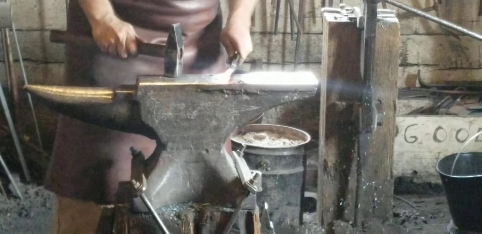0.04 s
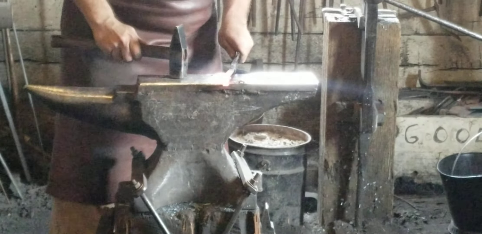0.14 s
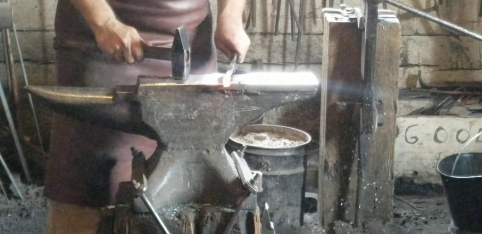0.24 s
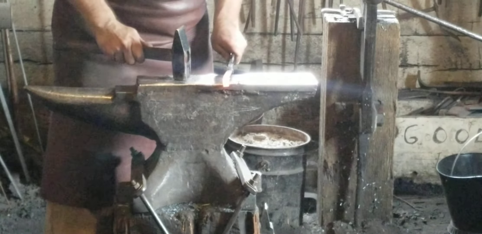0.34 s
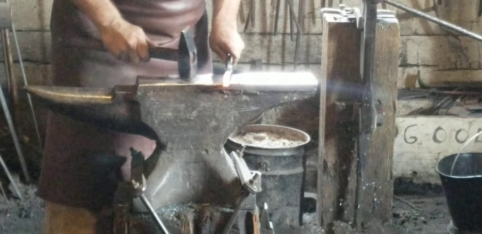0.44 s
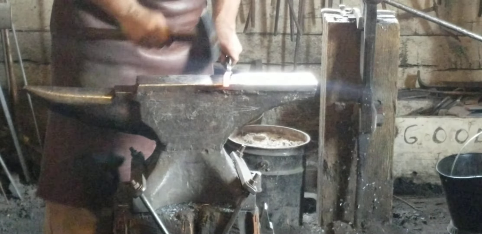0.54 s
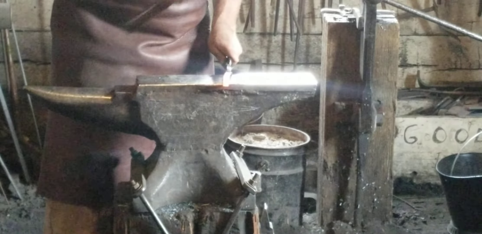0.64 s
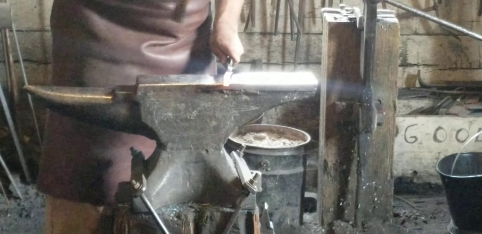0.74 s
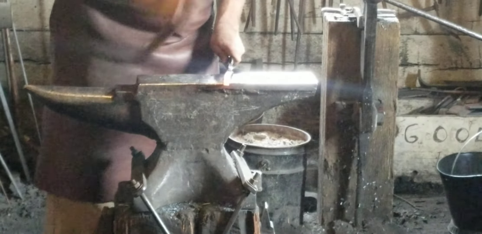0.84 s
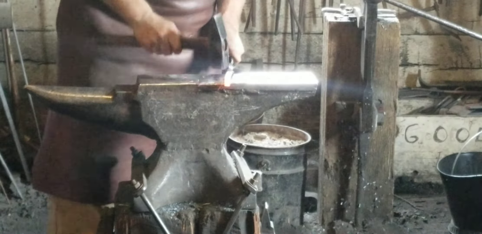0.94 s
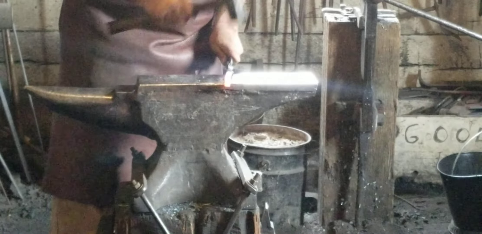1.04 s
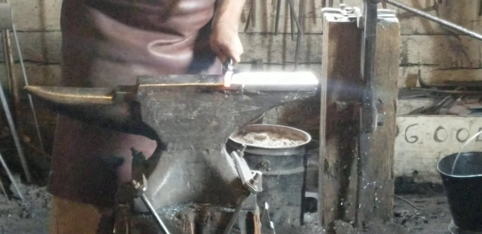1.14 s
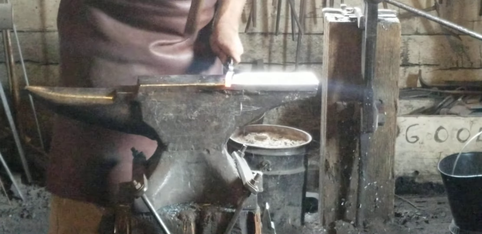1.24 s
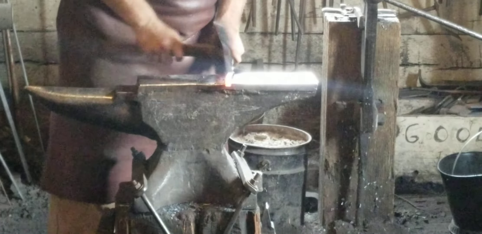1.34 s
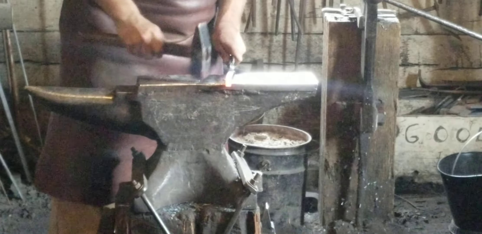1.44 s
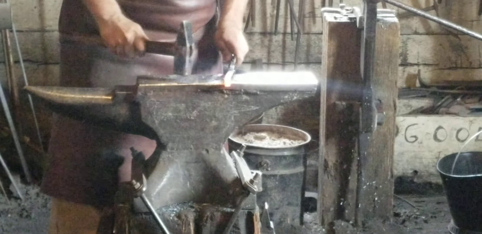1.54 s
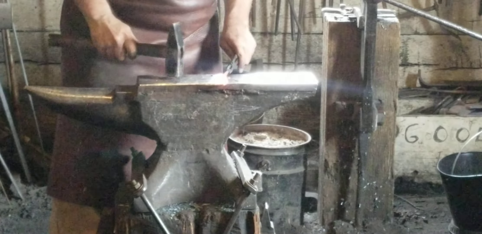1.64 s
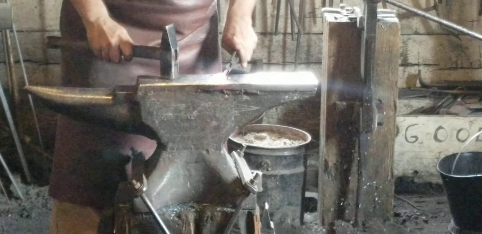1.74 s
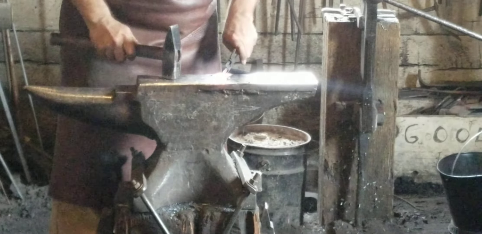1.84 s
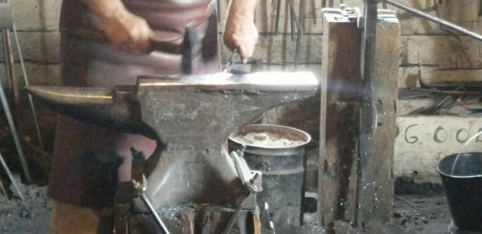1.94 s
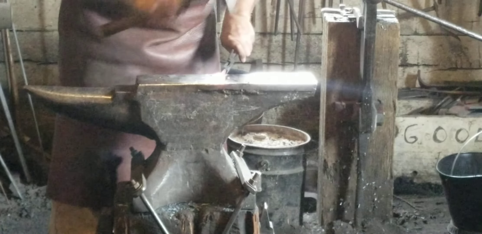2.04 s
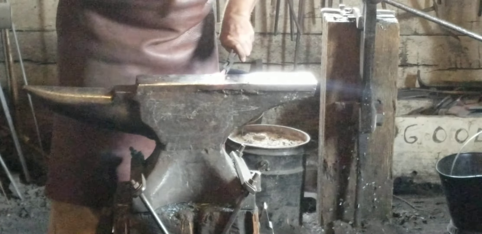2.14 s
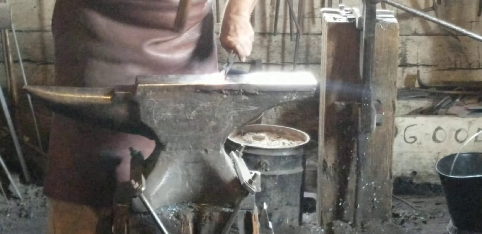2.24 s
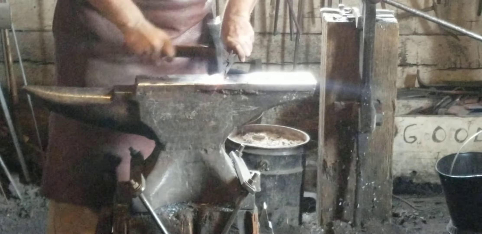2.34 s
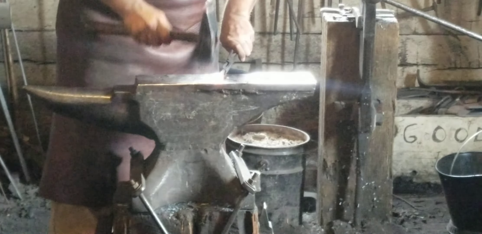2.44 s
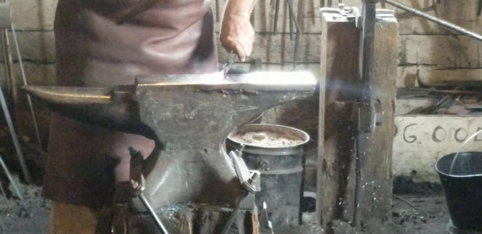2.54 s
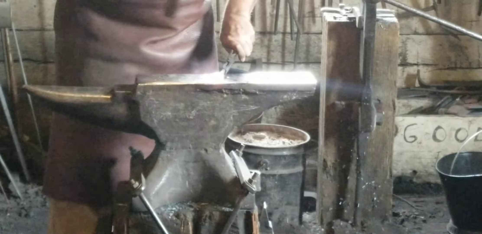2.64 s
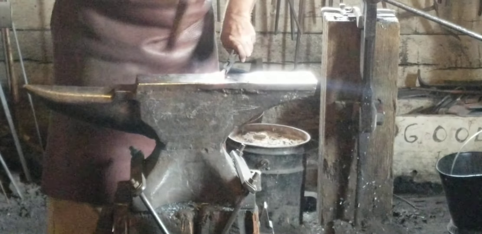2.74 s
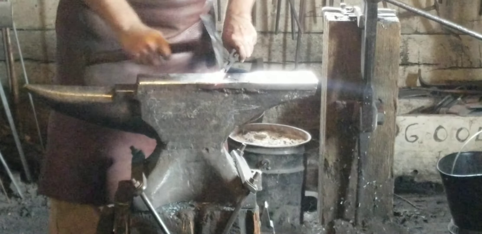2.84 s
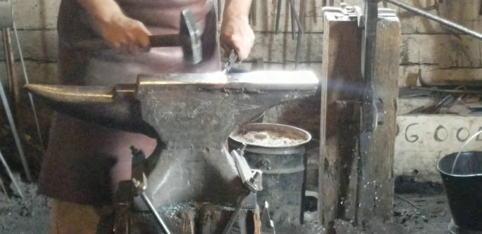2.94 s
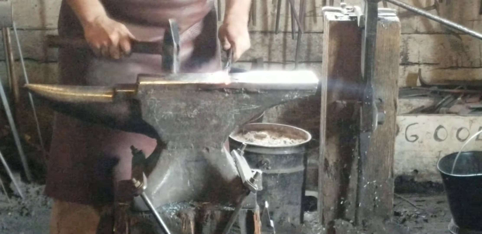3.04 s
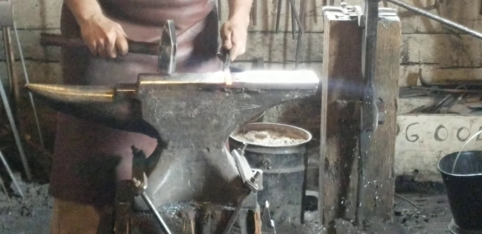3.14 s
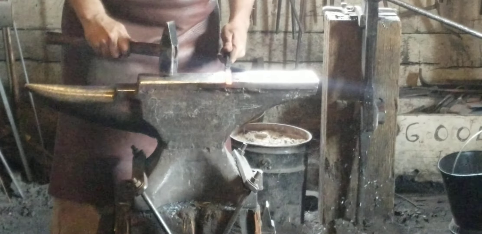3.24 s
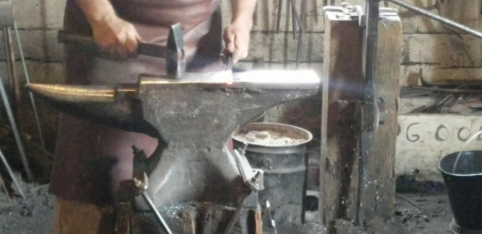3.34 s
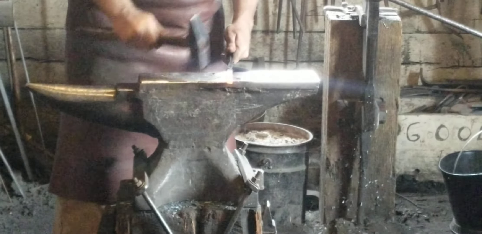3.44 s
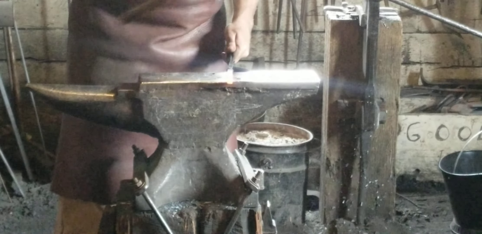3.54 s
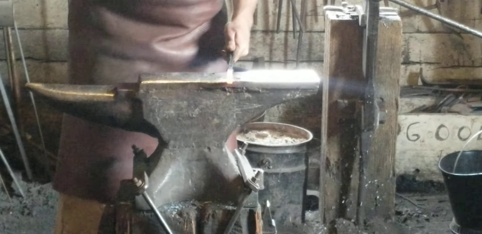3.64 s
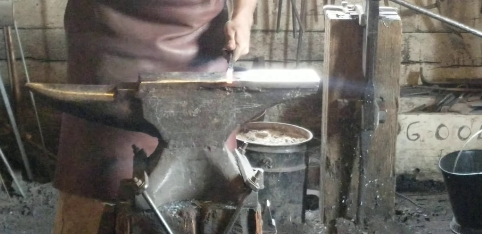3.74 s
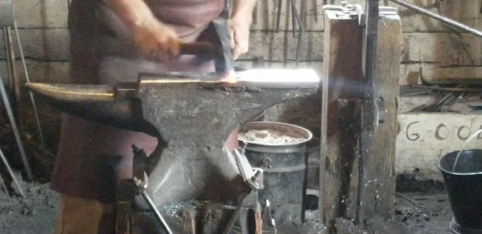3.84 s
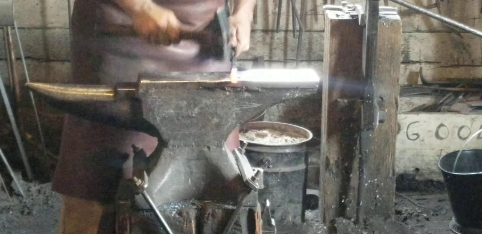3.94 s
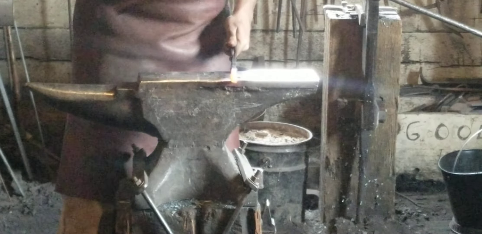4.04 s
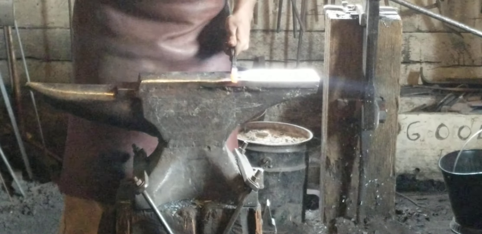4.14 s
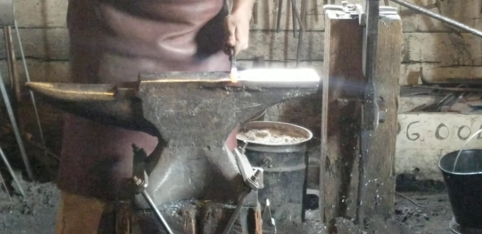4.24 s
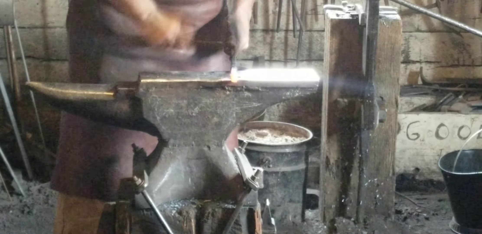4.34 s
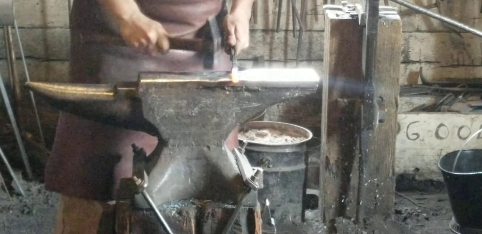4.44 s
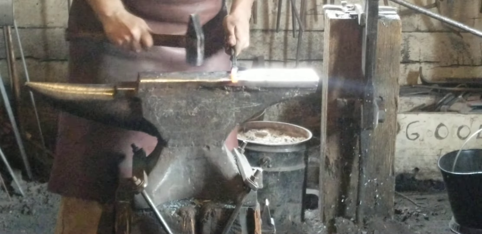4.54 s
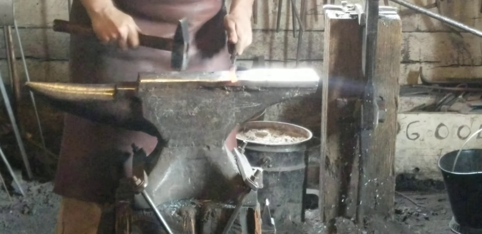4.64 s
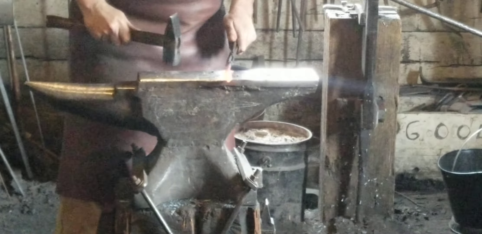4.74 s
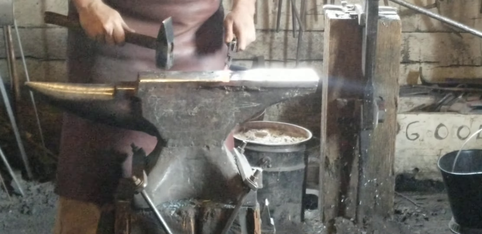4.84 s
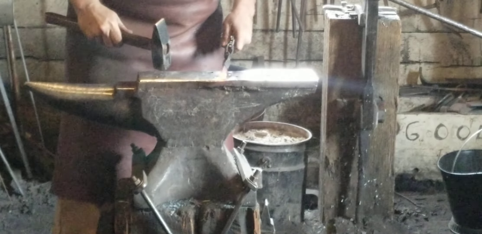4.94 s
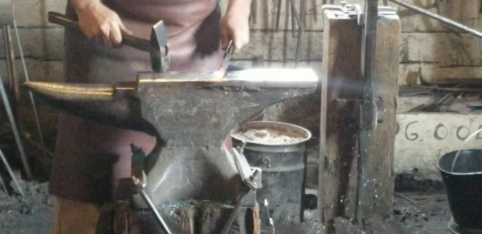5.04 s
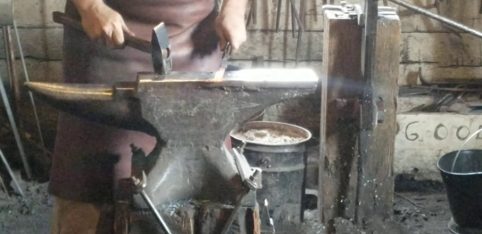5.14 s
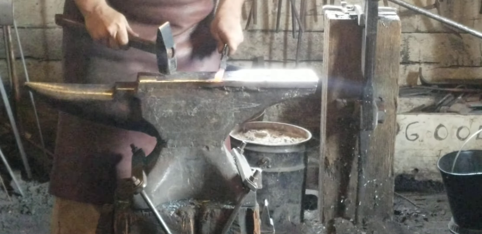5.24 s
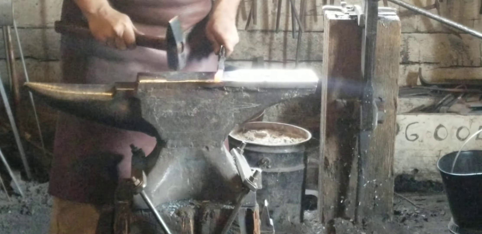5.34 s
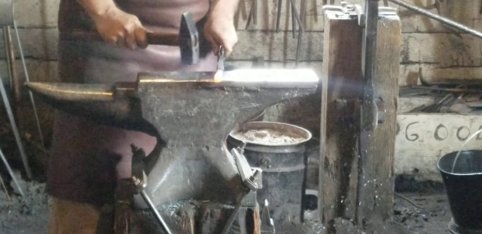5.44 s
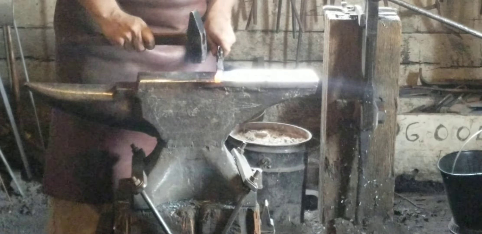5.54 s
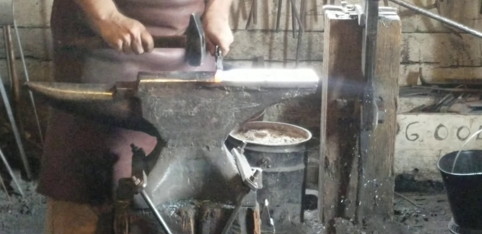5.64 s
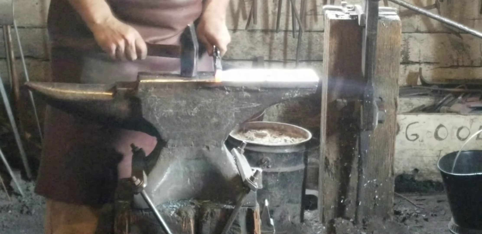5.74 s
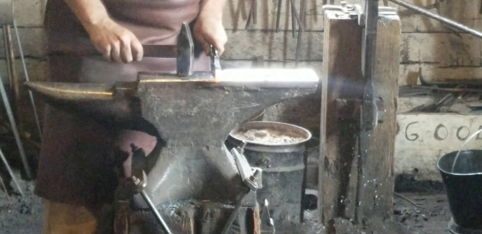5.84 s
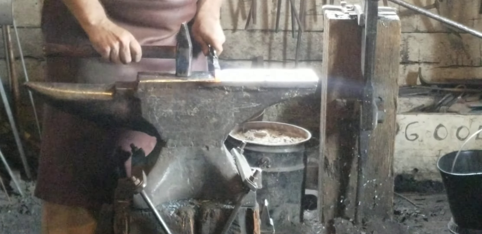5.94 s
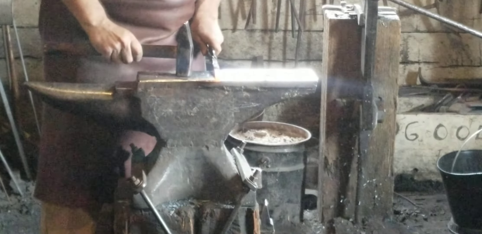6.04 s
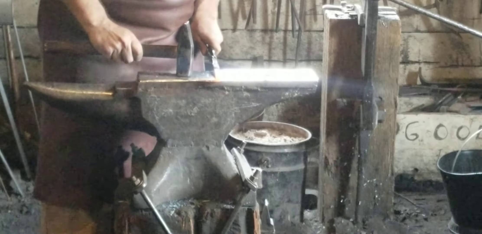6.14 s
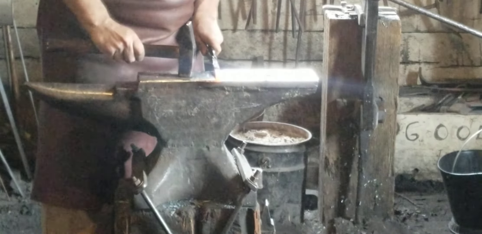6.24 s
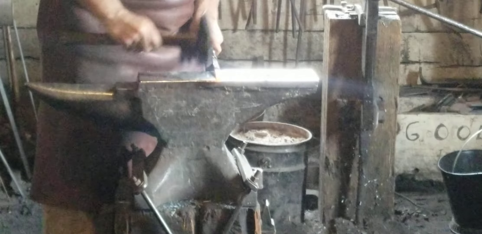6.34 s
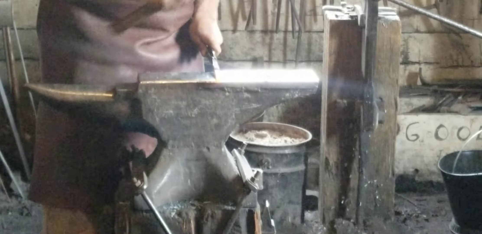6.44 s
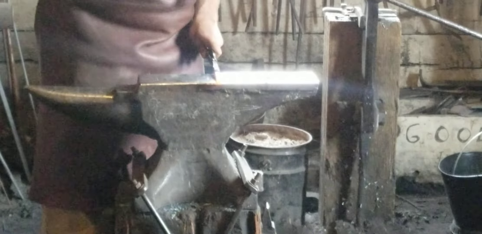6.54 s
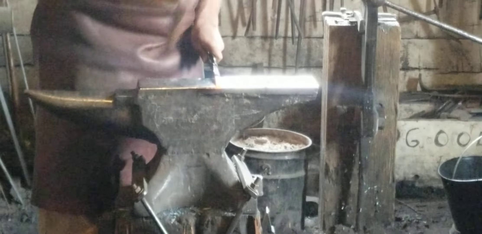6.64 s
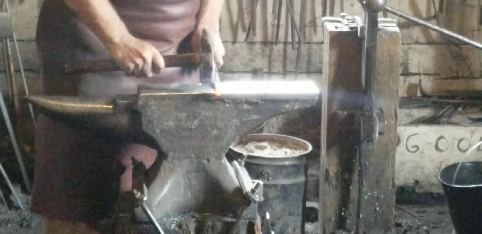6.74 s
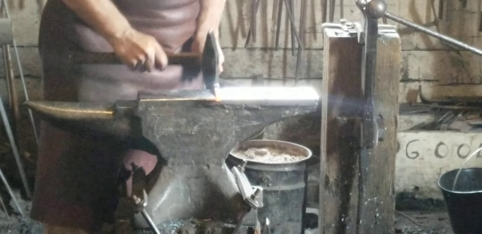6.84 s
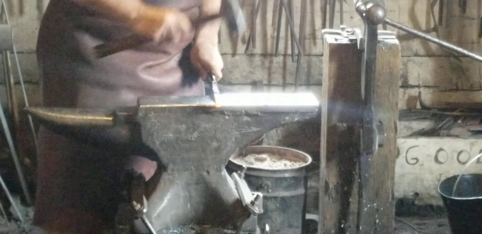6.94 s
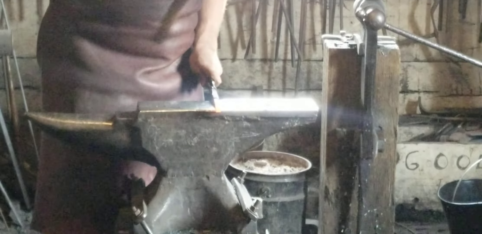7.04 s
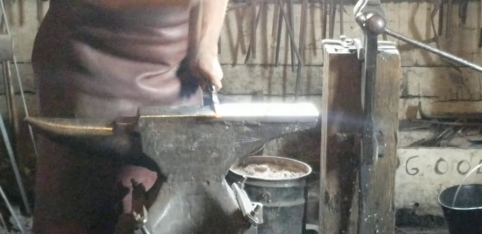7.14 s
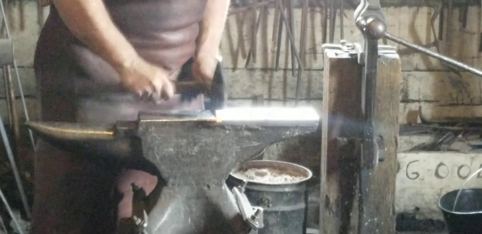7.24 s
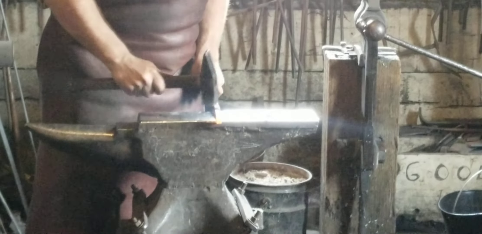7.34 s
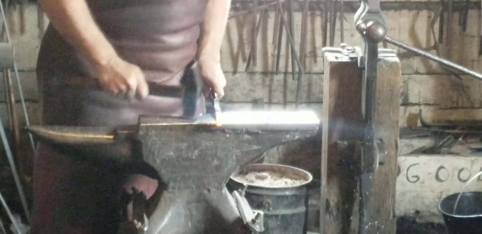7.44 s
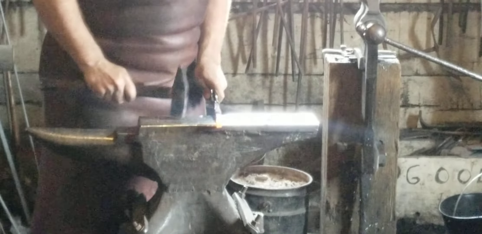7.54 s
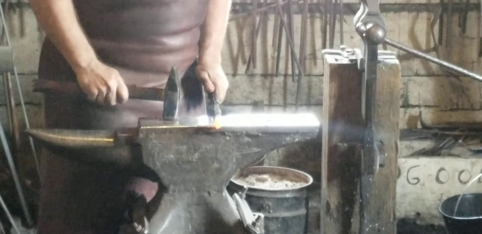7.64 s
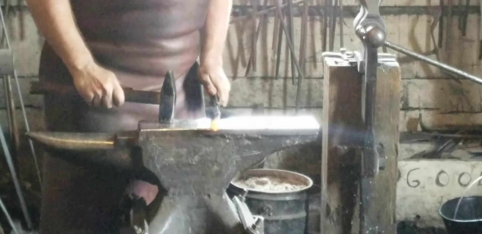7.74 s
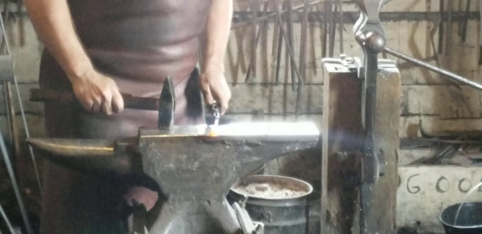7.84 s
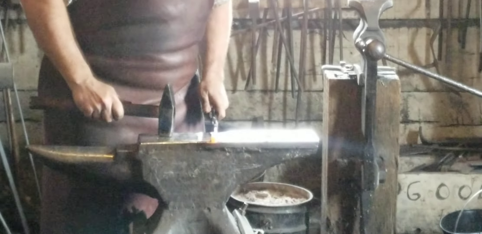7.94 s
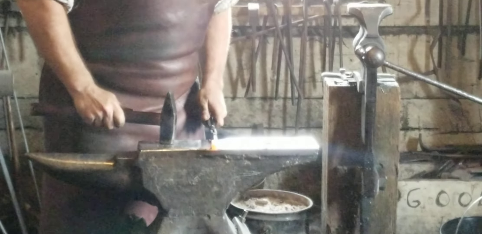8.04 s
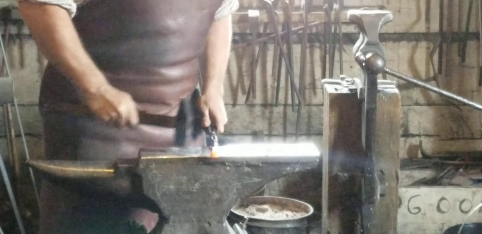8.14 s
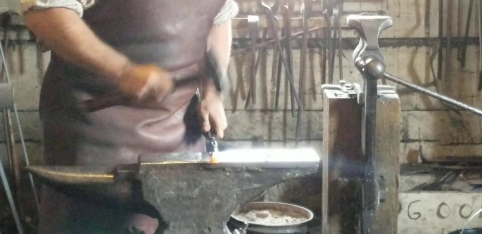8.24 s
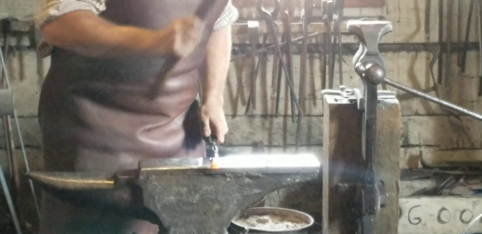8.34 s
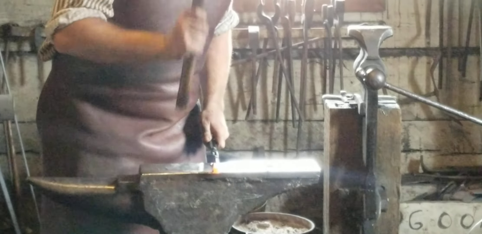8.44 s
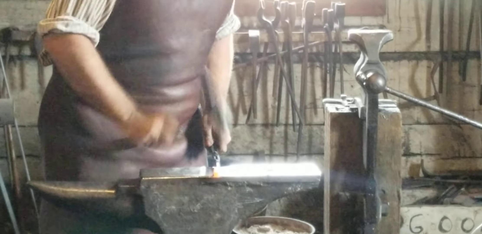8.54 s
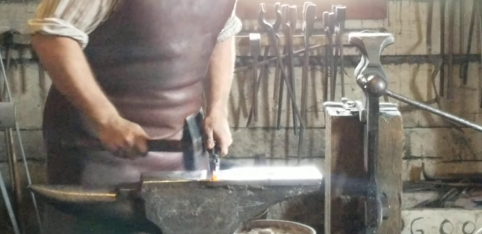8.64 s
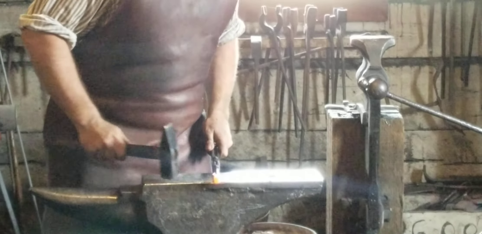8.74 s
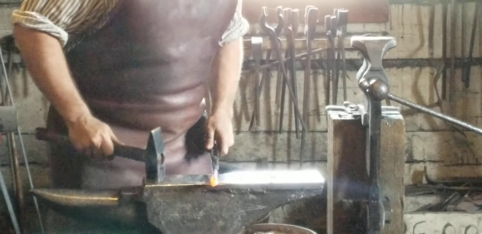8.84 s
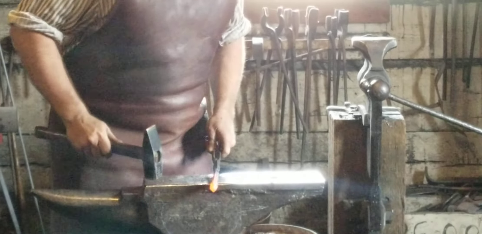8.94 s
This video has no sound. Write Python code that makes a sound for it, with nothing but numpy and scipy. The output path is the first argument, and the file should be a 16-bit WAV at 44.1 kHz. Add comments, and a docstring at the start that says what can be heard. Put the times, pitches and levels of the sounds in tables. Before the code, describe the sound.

Over the low rumble of a workshop machine, which eases after the first strike, a smith hammers hot steel in unhurried pairs of clanging, thudding blows. Between them the hammer drops lightly on the anvil, bouncing with high pings, and tongs scrape softly. The heavy blows pause past the middle, then three more fall amid faint rustles and tiny clicks. Everything is heard from nearby in a mildly reverberant room.

```python
"""A smith forges hot steel on an anvil in a brick workshop. At first a machine rumbles and hums while the
bar slides softly across the face. Then heavy blows fall, mostly in pairs: the stump thuds, the bar
clanks, the modes of the steel clang and the room reverberates. The rumble settles after the first blow.
Between blows the hammer drops lightly on the bare anvil, bounces and pings, and the tongs scrape.
Near the end come soft rustles as the smith moves, and a few small dry clicks."""
import sys
import numpy as np
from scipy import signal
from scipy.fft import rfft, irfft
from scipy.io import wavfile

SR = 44100
rng = np.random.default_rng(int(sys.argv[2]) if len(sys.argv) > 2 else 0)


def generate_wav(signal):
    """Clip the signal to [-1, 1] and save it as 16-bit WAV at the path in sys.argv[1]."""
    frames = np.transpose(np.atleast_2d(signal))
    scaled = np.clip(frames, -1, 1) * 32767
    pcm = np.round(scaled).astype(np.int16)
    wavfile.write(sys.argv[1], SR, pcm)


N = 396018
RESPONSE_T = np.arange(int(.9 * SR)) / SR   # time axis of an impulse response, in seconds
BAND_EDGES_HZ = np.geomspace(22, 17500, 40)
BAND_CENTRES_HZ = np.sqrt(BAND_EDGES_HZ[1:] * BAND_EDGES_HZ[:-1])

# natural frequencies of hammer and anvil: pitch_hz
MODE_HZ = np.array([1316, 1492, 1528, 1715, 1795, 1947, 2395, 2474, 2506, 2763, 3052, 3284, 4497, 4560, 5575, 5782, 8512, 9498, 10160, 10481, 13143])
# spectra of the stump's thud, the steel's clank, a light tick and a soft hiss: frequency_hz, density_db
THUD_SPECTRUM = [(30, -18), (60, -7), (100, 1), (170, 3.5), (290, -2), (380, -3), (520, -7.5), (800, -16.5),
                 (1500, -48.5)]
CLANK_SPECTRUM = [(200, -20.5), (450, -18.5), (750, -9), (1100, 1), (1500, 5), (1950, 1), (2300, 2.5),
                  (2800, -4.5), (4000, -18), (8000, -44)]
TICK_SPECTRUM = [(1000, -19.5), (2200, 10.5), (3400, 11.5), (4500, 7.5), (6200, 4.5), (8000, -1.5),
                 (9300, -24), (11000, -9.5), (13000, -16), (14200, -27.5), (16000, -39)]
HISS_SPECTRUM = [(300, -12), (550, 1), (900, -4), (1400, -7), (2200, -15.5), (3500, -28.5), (8000, -39.5),
                 (13000, -37), (16000, -38.5)]


def heavy_blows(room, modes, thud_db, push_db, boom_db, clank_db, crack_db, pan_db):
    """Impact excitation: the hammer hits the soft bar, the stump thuds, the struck steel rings."""
    # blows, each on its own spot: start_s, force_db, extra_clang_db, extra_ping_db
    blows = [(.901, -4.5, 3, -0.5), (1.347, 1, -2, -3.5), (2.35, 0, 0.5, 3.5), (2.8318, 2, -0.5, -1.5),
             (3.849, -0.5, 1, 4.5), (4.359, 2, -2.5, 15.5), (6.717, -8.5, 0, 4), (7.251, -.5, -1, -7.5),
             (8.568, -.5, -5, 3.5)]
    # crack of the hammer face: frequency_hz, density_db
    crack_spectrum = [(1000, -19), (2200, -3.5), (3000, 2.5), (4000, 2.5), (6200, 3), (8200, -2.5),
                      (9200, -20), (11000, 2), (13000, 6), (16000, -14.5)]
    # excitation of each mode by a blow: gain_db
    mode_db = [-23.5, -18.5, -19, -23.5, -25, -18, -16, -11.5, -4, -21, -21, -20, -30, -13.5, -25, -15.5,
               -17, -25, -8.5, -3.5, -7.5]
    # the five registers and their growth with force: gain_db; growth_db_per_db
    register_db = [-17, -15, -24, -29.5, -29.5]
    growth = [0.79, 1.2, 1.1, 0.41, 0.53]
    out = np.zeros((2, N))
    thud = from_db(thud_db) * room_impulse(room, THUD_SPECTRUM)[0]
    thud += from_db(push_db) * stump_push(low_hz=139, high_hz=281, t60_s=0.036)
    middle, treble = room_impulse(room, CLANK_SPECTRUM), room_impulse(room, crack_spectrum)
    for start_s, force_db, extra_clang_db, extra_ping_db in blows:
        clank, clang, crack, ping, zing = np.array(register_db) + force_db * np.array(growth)
        contact = blend_paths(from_db(clank + clank_db) * middle + from_db(crack + crack_db) * treble)
        ring = ringing(modes, mode_db, (clank, clang + extra_clang_db, crack, ping + extra_ping_db, zing))
        bass = thud + from_db(boom_db) * room_boom(pitch_hz=65.15, swell_s=.22)
        add(out, start_s, pan(contact + ring, pan_db) + bass)
    return out


def light_taps(room, modes, knock_db, clank_db, tick_db, pan_db):
    """Elastic impact on the bare face: a harder contact excites the high ping far more strongly."""
    # taps and bounces: start_s, strength_db, hardness_db, extra_clang_db, extra_zing_db
    taps = [(1.479, 2.5, -2, 13.5, -6), (1.609, 1, 2.5, -6, -4), (1.688, 1, 5.5, -5, -4),
            (3.035, 2, 5.5, -12, -3), (3.149, -1.5, 6, -1.5, -10), (3.229, 1.5, -4, -4, -4),
            (4.653, -2.5, 4.5, 2.5, 3.5), (4.882, -19.5, 2.5, 3.5, 0), (5.753, -2, 1.5, -4.5, 4),
            (5.843, 0.5, -11, 0, -3), (7.463, 4, -5.5, 0, -4), (7.569, 4, -6, -5, 1.5),
            (8.722, 0, -4, 14, -4), (8.858, -1.5, -8.5, 13.5, -1)]
    # excitation of each mode by a tap: gain_db
    mode_db = [-10, -17.5, -11, -12.5, -13.5, -17, -17.5, -13.5, -1.5, -8.5, -27, -21.5, -18, -10.5, -41,
               -24, -23.5, -53, -4, -3, 0.5]
    # the five registers and their growth with hardness: gain_db; growth_db_per_db
    register_db = [-38, -42, -34.5, -55.5, -50]
    growth = [0, 1, 0.7, 3.5, 0.6]
    out = np.zeros((2, N))
    body = from_db(clank_db) * room_impulse(room, CLANK_SPECTRUM)
    body += from_db(knock_db) * room_impulse(room, THUD_SPECTRUM)
    tick = from_db(tick_db) * room_impulse(room, TICK_SPECTRUM)
    for start_s, strength_db, hardness_db, extra_clang_db, extra_zing_db in taps:
        levels_db = np.array(register_db) + strength_db + hardness_db * np.array(growth)
        clank, clang, crack, ping, zing = levels_db
        contact = blend_paths(from_db(clank) * body + from_db(crack) * tick)
        ring = ringing(modes, mode_db, (clank, clang + extra_clang_db, crack, ping, zing + extra_zing_db))
        add(out, start_s, contact + ring)
    return pan(out, pan_db)


def steel_modes(room, wet, linger):
    """Free vibration: each normal mode is a damped sine, heard with its wavering reverberation."""
    # decay time of each mode: t60_s
    mode_t60_s = [0.84, 0.38, .45, 0.52, .4, 0.41, .26, 0.38, 0.29, 0.35, 0.27, 0.41, 0.32, 0.22, 0.36, .3,
                  0.3, 0.18, 0.63, 0.34, 0.53]
    response, modes = room[:, 0].sum(axis=0), []
    for pitch_hz, t60_s in zip(MODE_HZ, mode_t60_s):
        phase = rng.uniform(0, np.pi, (2, 1))
        sine = np.sin(2 * np.pi * pitch_hz * RESPONSE_T + phase) * decay(t60_s)
        reverb = convolve(sine, response) * decay(linger * t60_s)
        ring = sine / sine.std() + wet * reverb / reverb.std(axis=1, keepdims=True)
        modes.append(ring / ring.std(axis=1, keepdims=True) * unit_onset(sine).std())
    return np.array(modes)


def ringing(modes, mode_db, register_db):
    """Modal superposition: the point of impact sets how strongly each register and mode is excited."""
    register_edges_hz = [2200, 3150, 9850, 10320]   # between clank, clang, crack, ping and zing
    register = np.searchsorted(register_edges_hz, MODE_HZ)
    scatter_db = 3.0 * rng.standard_normal(len(MODE_HZ))
    gains = from_db(np.array(mode_db) + np.array(register_db)[register] + scatter_db)
    return np.tensordot(gains, modes, axes=1)


def stump_push(low_hz, high_hz, t60_s):
    """Heavily damped oscillation: the anvil drives its stump down, which swings at two frequencies."""
    swing = np.sin(2 * np.pi * low_hz * RESPONSE_T) - np.sin(2 * np.pi * high_hz * RESPONSE_T)
    return unit_onset(swing * decay(t60_s))


def room_boom(pitch_hz, swell_s):
    """Resonance: a low room mode swells a moment after a heavy blow."""
    swell = (RESPONSE_T / swell_s) ** 2
    phase = rng.uniform(0, 2 * np.pi)
    return np.sin(2 * np.pi * pitch_hz * RESPONSE_T + phase) * swell * np.exp(1 - swell)


def tong_scrapes(room):
    """Rough friction: as the tongs turn the bar, a grainy force drives the response of the contact."""
    # scrapes on the anvil: start_s, decay_s, level_db
    scrapes = [(2.089, .036, -57), (3.59, 0.24, -59), (4.25, 0.065, -62.5), (5.137, 0.0068, -52.5),
               (5.164, 0.056, -42.5), (5.682, 0.11, -56.5), (6.148, 0.068, -65.5), (6.924, 0.07, -53),
               (7.21, 0.039, -54.5), (8.238, 0.11, -63)]
    # bright grit: frequency_hz, density_db
    grit_spectrum = [(2000, -27.5), (5000, -11), (7500, -12), (9300, -14.5), (12500, 8.5), (16000, -2.5)]
    # shares of clank, tick and grit: gain_db
    mix_db = [-0.5, -1, -7]
    out = np.zeros((2, N))
    spectra = (CLANK_SPECTRUM, TICK_SPECTRUM, grit_spectrum)
    paths = sum(from_db(db) * room_impulse(room, spectrum) for db, spectrum in zip(mix_db, spectra))
    for start_s, decay_s, level_db in scrapes:
        grain = from_db(level_db) * blend_paths(paths) * decay(t60_s=2.2)
        add(out, start_s, convolve(grain, crunch(decay_s)))
    return out


def crunch(decay_s):
    """Brittle fracture: crushed scale gives uneven force pulses that die away, of unit total energy."""
    grains = rng.standard_normal(SR // 4) ** 3 * np.exp(-RESPONSE_T[:SR // 4] / decay_s)
    return grains / np.linalg.norm(grains)


def clicks(room, log_half_width, room_db):
    """Band-limited transients: brief gritty contacts, each followed by its reflections."""
    # clicks and chinks: start_s, level_db, pitch_hz, decay_s
    contacts = [(8.01, -63, 10600, 0.016), (8.026, -63, 3900, 0.0081), (8.407, -48.5, 1100, 0.00021)]
    out = np.zeros((2, N))
    for start_s, level_db, pitch_hz, decay_s in contacts:
        band_hz = pitch_hz * np.exp([-log_half_width, log_half_width])
        pulse = band_pass(crunch(decay_s) + 1e-18, band_hz, order=3)
        echo = convolve(pulse, blend_paths(room.sum(axis=0)))
        add(out, start_s, from_db(level_db) * unit_onset(pulse[None]))
        add(out, start_s, from_db(level_db + room_db) * unit_onset(echo))
    return out


def bar_slide(peak_s, spread_s, level_db):
    """Sliding friction: the bar drawn across the face makes a soft band of noise."""
    # steel rubbing on steel: frequency_hz, density_db
    rub_spectrum = [(1400, -18), (1900, 0), (2350, -1), (2800, -9), (3300, -24), (4500, -22), (6000, -30)]
    return stroke(peak_s, spread_s, level_db) * steady_noise(rub_spectrum)


def rustling():
    """Amplitude modulation: dull noise swells and fades as the smith moves."""
    # movements: peak_s, spread_s, level_db
    rustles = [(6.96, 0.13, -44), (8.33, 0.22, -54.5)]
    return sum(stroke(*row) for row in rustles) * steady_noise(HISS_SPECTRUM)


def workshop(direct_db, direct_t60_s, rise_s, early_db, early_t60_s, wall_delay_s,
             slap_db, slap_s, slap_spread_s, paths):
    """Reverberation: direct sound, a slap off the nearest wall, early echoes and tail add in energy."""
    # reverberation time: frequency_hz, t60_s
    room_t60 = [(60, 1), (150, 0.84), (300, 0.73), (700, .75), (1500, 0.64), (3000, 0.59), (6000, 0.41),
                (10000, .38), (15000, 0.1)]
    white, bands = rng.standard_normal((2, 2, paths, 1, len(RESPONSE_T))), []
    build_up = 1 - np.exp(-(RESPONSE_T / wall_delay_s) ** 4)
    direct = from_db(direct_db) * decay(direct_t60_s) * (1 - np.exp(-RESPONSE_T / rise_s))
    slap = from_db(slap_db) * np.exp(-((RESPONSE_T - slap_s) / slap_spread_s) ** 2)
    early = from_db(early_db) * decay(early_t60_s)
    for k, hz in enumerate(BAND_CENTRES_HZ):
        tail = decay(at_hz(room_t60, hz))
        envelope = np.sqrt(direct ** 2 + slap ** 2 + build_up * (early ** 2 + tail ** 2))
        band = band_pass(stereo_noise(hz, *white[k % 2]) * envelope, BAND_EDGES_HZ[k:k + 2], order=2)
        energy = np.sum(band ** 2, axis=(1, 2), keepdims=True)
        bands.append(band * np.sqrt(hz / energy))   # equal energy per hertz
    return np.array(bands)   # axes: band, path, channel, time


def machine(rumble_db, hiss_db, start_extra_db, hiss_share, hold_s, settle_s, phase_wander):
    """Broadband noise plus a line spectrum: rumble and hiss settle together under a wandering hum."""
    # low rumble: frequency_hz, density_db
    rumble_spectrum = [(20, -29), (35, -11.5), (70, -2.5), (110, 0.5), (180, -7.5), (260, -10.5),
                       (330, -14), (430, -15.5), (500, -34), (900, -32)]
    # hum lines: pitch_hz, level_db
    hum_lines = [(118.6, -45.5), (183, -54.5), (350, -58.5), (431, -59)]
    t = np.arange(N) / SR
    extra_db = start_extra_db * np.exp(-np.maximum(t - hold_s, 0) / settle_s)
    out = from_db(rumble_db + extra_db) * steady_noise(rumble_spectrum)
    out += from_db(hiss_db + hiss_share * extra_db) * steady_noise(HISS_SPECTRUM)
    for pitch_hz, level_db in hum_lines:
        drift = phase_wander * np.cumsum(rng.standard_normal(N)) / np.sqrt(SR)
        out += np.sqrt(2) * from_db(level_db) * np.sin(2 * np.pi * pitch_hz * t + drift)
    return out


def room_impulse(room, spectrum):
    """Linear filtering: weighting the room's bands gives a click of this spectrum on every path."""
    return unit_onset(np.tensordot(from_db(at_hz(spectrum, BAND_CENTRES_HZ)), room, axes=1))


def blend_paths(paths):
    """Superposition: each spot that is hit radiates into its own random blend of paths."""
    blend = rng.standard_normal(len(paths))
    return np.tensordot(blend / np.linalg.norm(blend), paths, axes=1)


def steady_noise(spectrum):
    """Spectral shaping: white noise becomes stereo noise of this spectrum, rms 1."""
    hz = np.arange(1, N // 2 + 2) * SR / N
    mid, side = rfft(rng.standard_normal((2, N)))
    roll_off = np.minimum(1, hz / spectrum[0][0]) ** 2 * np.minimum(1, spectrum[-1][0] / hz) ** 4
    noise = irfft(stereo_noise(hz, mid, side) * from_db(at_hz(spectrum, hz)) * roll_off, N)
    return noise / noise.std()


def stereo_noise(hz, mid, side):
    """Spatial coherence: left and right are alike in the bass, nearly unrelated in the treble."""
    # likeness of left and right: frequency_hz, correlation
    coherence = [(60, 0.98), (200, 0.96), (400, 0.86), (700, 0.42), (1200, -0.062), (2500, -0.2),
                 (5000, -0.017), (15000, -0.045)]
    alike = at_hz(coherence, hz)
    return np.sqrt(1 + alike) * mid + np.sqrt(1 - alike) * side * np.array([[1], [-1]])


def stroke(peak_s, spread_s, level_db):
    """Gaussian envelope of a smooth movement."""
    return from_db(level_db) * np.exp(-((np.arange(N) / SR - peak_s) / spread_s) ** 2)


def decay(t60_s):
    """Exponential damping, 60 dB down after t60_s."""
    return np.exp(-np.log(1000) * RESPONSE_T / t60_s)


def from_db(db):
    """Decibels to amplitude ratio."""
    return 10 ** (np.asarray(db) / 20)


def at_hz(points, hz):
    """Interpolation on a log-frequency axis."""
    frequencies_hz, values = np.array(points).T
    return np.interp(np.log(hz), np.log(frequencies_hz), values)


def unit_onset(x):
    """Normalisation of each channel to rms 1 over its first 50 ms."""
    return x / np.sqrt(np.mean(x[..., :SR // 20] ** 2, axis=-1, keepdims=True))


def band_pass(x, edges_hz, order):
    """Maximally flat filtering between two edges."""
    return signal.sosfilt(signal.butter(order, edges_hz, "band", fs=SR, output="sos"), x)


def convolve(a, b):
    """Convolution: one short response passed through another."""
    return signal.fftconvolve(np.atleast_2d(a), np.atleast_2d(b), axes=1)[:, :len(RESPONSE_T)]


def pan(sound, pan_db):
    """Level difference between the ears, left minus right."""
    return sound * from_db([[pan_db / 2], [-pan_db / 2]])


def add(out, start_s, sound):
    """Superposition of a sound on the mix at start_s."""
    start = int(start_s * SR)
    out[:, start:start + sound.shape[1]] += sound[:, :N - start]


def scene():
    """Superposition of all sources; blows, taps, scrapes and clicks share one room response."""
    room = workshop(direct_db=9, direct_t60_s=0.031, rise_s=0.00059,
                    early_db=3, early_t60_s=0.19, wall_delay_s=.009,
                    slap_db=1.5, slap_s=0.012, slap_spread_s=0.0033, paths=3)
    modes = steel_modes(room, wet=2.1, linger=2.6)
    blows = heavy_blows(room, modes, thud_db=-27.5, push_db=-26, boom_db=-34,
                        clank_db=-3.0, crack_db=3.5, pan_db=-3)
    taps = light_taps(room, modes, knock_db=-8, clank_db=-2.5, tick_db=-4.5, pan_db=-2.5)
    handling = tong_scrapes(room) + clicks(room, log_half_width=0.4, room_db=-1.5)
    handling += bar_slide(peak_s=0.16, spread_s=0.24, level_db=-63.5) + rustling()
    background = machine(rumble_db=-41.5, hiss_db=-58.5, start_extra_db=7, hiss_share=0.4,
                         hold_s=1, settle_s=.8, phase_wander=3.0)
    return blows + taps + handling + background


def record(dry):
    """Soft saturation rounds the highest peaks; a steep low-pass cuts the top of the treble."""
    cutoff_hz = 15850
    return signal.sosfilt(signal.ellip(10, .2, 80, cutoff_hz, fs=SR, output="sos"), np.tanh(dry))


dry = scene()
out = record(dry)
generate_wav(out)
```